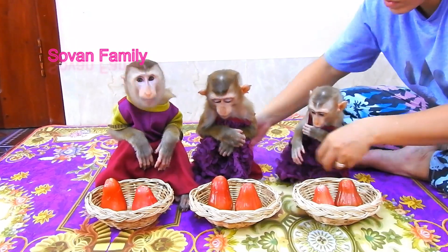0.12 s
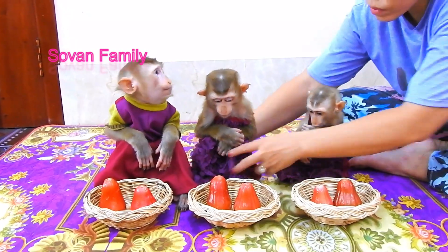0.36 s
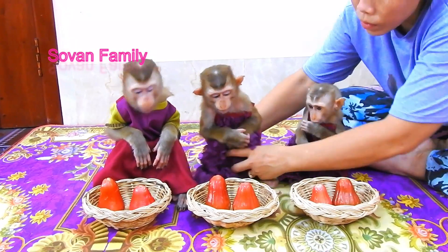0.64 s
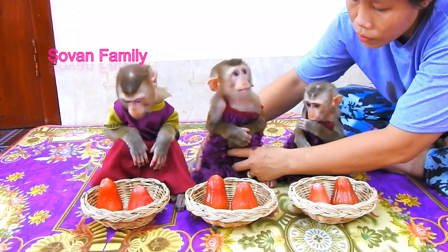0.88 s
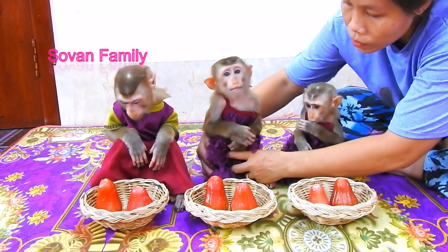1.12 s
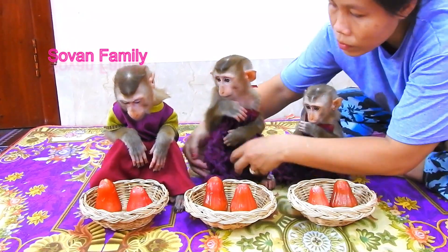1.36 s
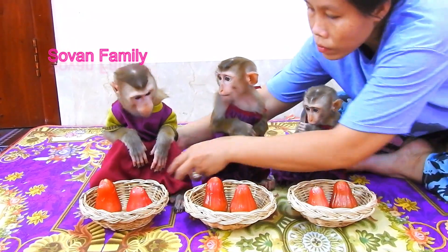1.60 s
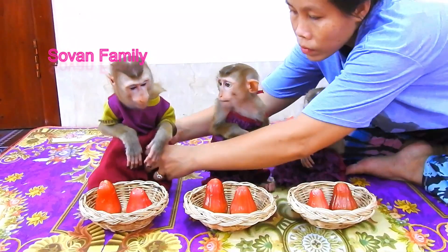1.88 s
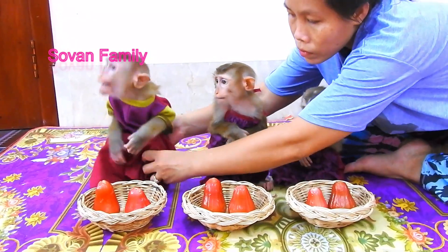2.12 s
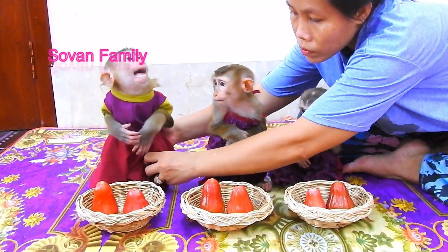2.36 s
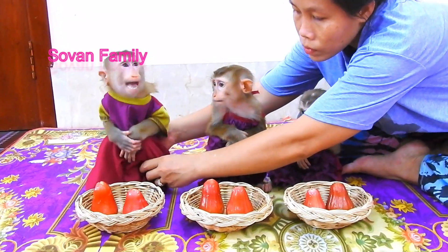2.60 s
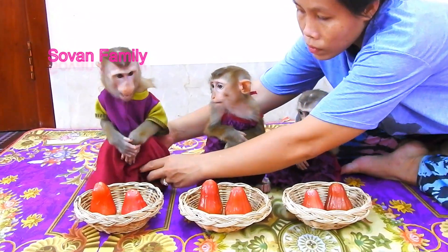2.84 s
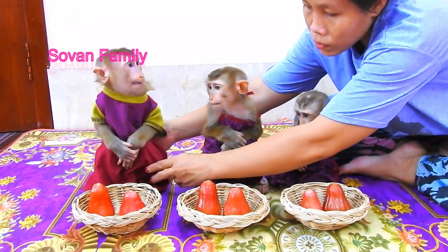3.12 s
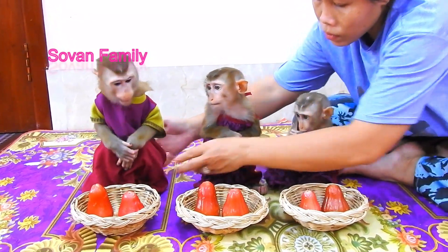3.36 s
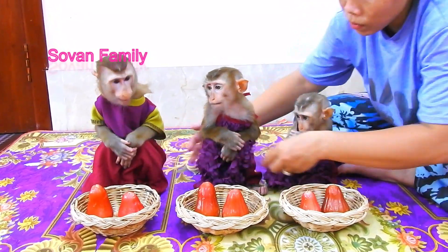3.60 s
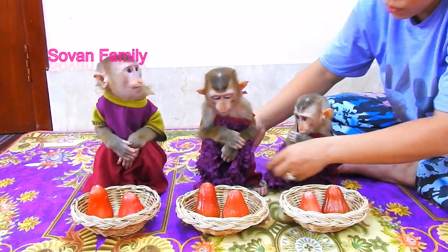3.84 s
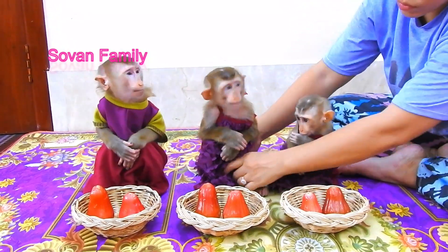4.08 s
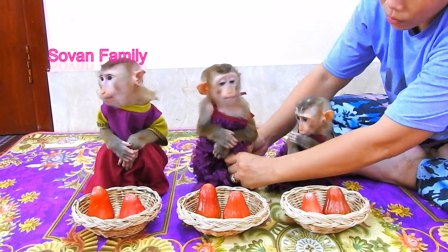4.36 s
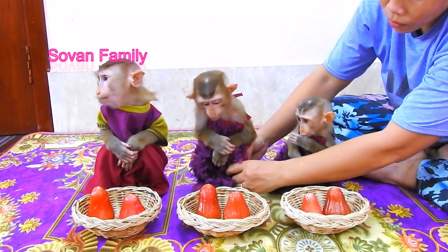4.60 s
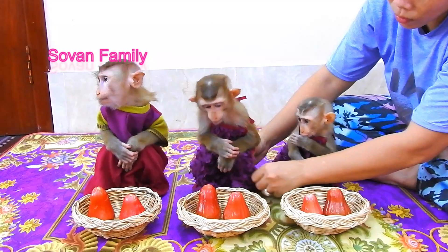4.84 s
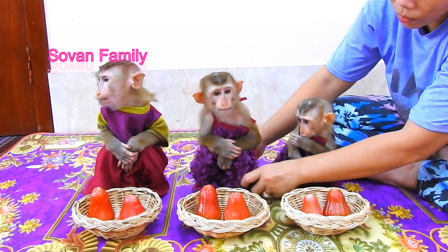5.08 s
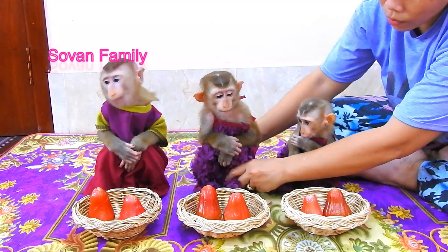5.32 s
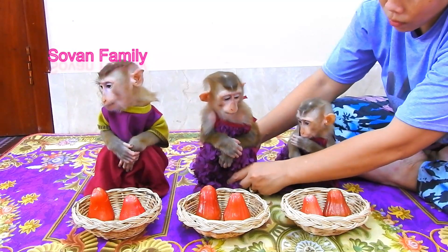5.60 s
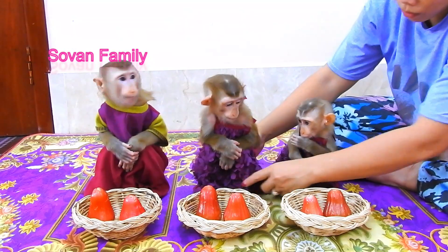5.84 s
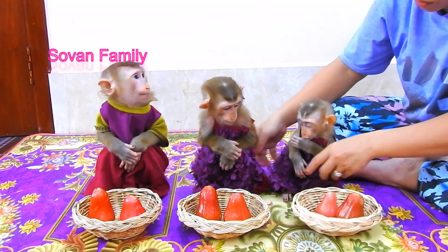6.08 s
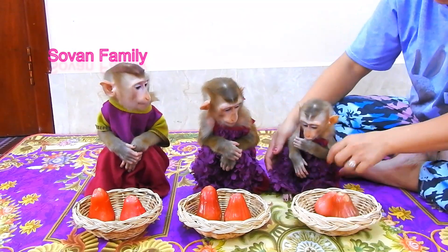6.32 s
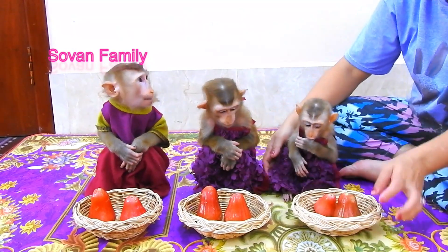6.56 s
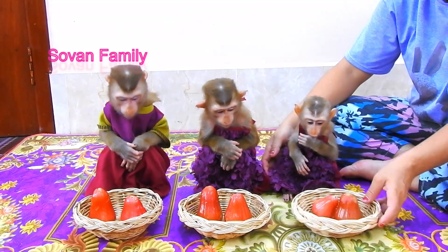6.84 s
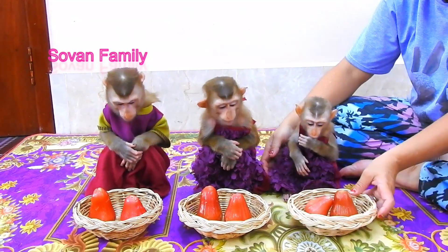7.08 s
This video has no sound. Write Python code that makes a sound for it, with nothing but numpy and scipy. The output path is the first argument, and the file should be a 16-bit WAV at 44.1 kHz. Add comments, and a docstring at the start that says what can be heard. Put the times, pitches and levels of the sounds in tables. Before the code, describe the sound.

Seven shrill young monkey chirps ring in a bare hard room, with low air buffeting, faint cloth and wicker rustling, then a soft coo.

```python
"""Three young monkeys in a bare, hard room, close to the microphone, as hands straighten their clothes.
Seven shrill chirps are swept partials around a whistled octave; a later coo is a stack of harmonics.
Cloth and wicker rustle as shaped crackle and ringing ticks, and echoes and a noisy tail make the room.
Moving air buffets the two ports as low noise and decaying puffs, over faint room noise.
A limiter holds the treble of the loud chirps flat and ducks the bass with it."""
import sys
import numpy as np
from scipy import signal
from scipy.fft import rfft, irfft, next_fast_len
from scipy.io import wavfile
from scipy.ndimage import uniform_filter1d

SR = 44100
rng = np.random.default_rng(int(sys.argv[2]) if len(sys.argv) > 2 else 0)


def waveform_to_disk(signal):
    """Save audio, clipped to [-1, 1], as 16-bit WAV at the path in sys.argv[1]."""
    frames = np.transpose(np.atleast_2d(signal))
    scaled = np.clip(frames, -1, 1) * 32767
    samples = np.round(scaled).astype(np.int16)
    wavfile.write(sys.argv[1], SR, samples)


def gain_from_db(level_db):
    """Convert decibel levels to linear amplitude factors (20 dB per decade)."""
    decades = np.asarray(level_db, float) / 20
    return 10 ** decades


N = 317386

# Room noise spectrum. Each row: frequency in Hz, relative density in dB per Hz.
AIR_COLOUR = [(15, -79), (25, -16.5), (107, 4.5), (160, -10.5), (215, -10), (246, -14.5), (340, -10.5),
              (421, -16), (614, -14), (782, -15.5), (919, -13.5), (2360, -23), (6730, -19.5),
              (10400, -40.5), (15500, -61)]
AIR_DB = -62  # rms
# Likeness of the room noise at the two ports. Each row: frequency in Hz, likeness from 0 to 1.
AIR_LIKENESS = [(60, 0.99), (180, 0.9), (550, 0.9), (1650, 0.9), (4970, 0.64), (15000, 0.18)]

# Moving air on the ports. Each row: time in seconds, rumble level in dB.
BUFFET_LEVEL = [(0.0, -46), (0.62, -49), (0.86, -54), (1.06, -43), (1.26, -58), (1.8, -60.5), (2.36, -54.5),
                (2.53, -37), (2.86, -58.5), (3.05, -70.5), (4.0, -76)]
# Rumble spectrum. Each row: frequency in Hz, relative density in dB per Hz.
BUFFET_COLOUR = [(12, -41), (20, -29), (59, 2.5), (107, 2), (186, -8), (251, -26.5), (364, -34), (544, -46),
                 (700, -59), (910, -85), (1540, -120)]
# The strongest puffs. Each row: start in seconds, level in dB, settled pitch in Hz, left minus right in dB.
THUMPS = [(0.049, -38, 102, 0), (0.181, -33.5, 103, 16), (0.308, -31, 68, 5), (0.348, -26, 113, 0),
          (0.479, -30, 97, -2), (0.521, -28.5, 173, -4), (0.587, -25.5, 74.6, -3),
          (0.658, -34, 100.5, 13.5), (0.919, -34, 64, 13), (0.972, -25.5, 104, -4), (1.148, -27, 92.5, 8.5),
          (1.558, -37.5, 64.6, -9), (1.638, -36.5, 88.5, -3), (1.856, -18, 119, 2.5), (1.89, -28, 132, 6),
          (1.952, -28, 70.4, -1), (1.985, -35, 78, 3), (2.533, -28, 111, -2), (2.575, -25.5, 97, 0),
          (2.617, -36, 98, -2), (2.677, -32, 110, -3), (2.917, -36.5, 87.5, -1)]
THUMP_T60_S = 0.083
THUMP_SAG, THUMP_SAG_S = 0.85, 0.0034  # the first swing is faster by this share, then settles
PUFFS_PER_S, PUFF_DB = 14, 10.5  # small puffs; dB above the rumble
PUFF_LOW_HZ, PUFF_HIGH_HZ = 67, 163

# Strokes of the hands over cloth and wicker. Each row: start in seconds, length in seconds,
# level of the 8.5-13 kHz band in dB at the hands.
STROKES = [(0.0, 0.16, -86), (0.566, 0.23, -79.5), (0.897, 0.18, -80.5), (1.04, 0.18, -76),
           (1.296, 0.27, -91), (1.764, 0.16, -76), (1.894, 0.42, -75), (4.245, 0.29, -85.5),
           (4.46, 0.81, -88.5), (5.202, 0.32, -92), (5.992, 0.068, -72.5), (6.06, .25, -83),
           (6.393, 0.15, -84)]
STROKE_RISE, STROKE_FADE_DB = 0.18, -5.5  # share of the length; loss by the end
# Fibre crackle spectrum. Each row: frequency in Hz, relative density in dB per Hz.
RUSTLE_COLOUR = [(180, -32), (300, -3), (391, -17), (907, -13), (1030, -19), (1300, -11), (2100, -11),
                 (6790, -7), (15500, -46)]
# Single ticks. Each row: start in seconds, ring level in dB at the hands, ring pitch in Hz,
# snap level in dB at the hands.
TICKS = [(.611, -53, 2500, -46), (1.859, -51, 770, -51), (4.47, -49.5, 1940, -44), (6.01, -56, 3100, -50),
         (6.068, -54, 1176, -50), (6.07, -37.5, 6600, -47), (6.08, -52, 4500, -48), (6.412, -48, 594, -63)]
# Snap spectrum. Each row: frequency in Hz, relative density in dB per Hz.
SNAP_COLOUR = [(300, 3), (1500, -3.5), (3000, 0), (6500, -1.5), (10000, -20.5), (15500, -43)]
TICK_RISE_S, TICK_FUZZ = 0.0003, 0.68  # fuzz: rms share by which the ring flickers

# First wall echoes. Each row: delay in seconds, left and right level in dB before the echo colour.
ECHOES = [(.006, -5, -42), (.011, -4, 3.5), (0.015, -8, -6.5), (.021, -11.5, -9), (0.029, -40, -19.5)]
# Walls and cloth swallow part of the top. Each row: frequency in Hz, gain in dB.
ECHO_COLOUR = [(3000, -2), (5000, -5.5), (7000, -8), (12000, 4.5)]
# Room tail. Each row: frequency in Hz, 60 dB decay time in seconds, left-right likeness from 0 to 1.
ROOM = [(500, 0.75, 1), (2500, 0.64, 0.79), (4900, 0.64, 0.63), (8000, 0.58, 0.12), (12800, 0.5, 0.081)]

# One table a chirp. Each row: time in seconds, pitch (half the octave) in Hz, effort in dB.
CHIRPS = [
    [(1.957, 3204, -53.5), (1.971, 3375, -39.5), (1.983, 3560, -42), (2.006, 3476, -40.5)],
    [(2.150, 3505, -32), (2.159, 3130, -25.5), (2.172, 3497, -27), (2.204, 3300, -24.5), (2.220, 2610, -31)],
    [(2.403, 3810, -30), (2.408, 3398, -24), (2.417, 3795, -26), (2.430, 3883, -29), (2.450, 3172, -24.5),
     (2.466, 2844, -20.5), (2.474, 2047, -38)],
    [(2.695, 3896, -22.5), (2.716, 4188, -30.5), (2.734, 3606, -22), (2.743, 3540, -28),
     (2.757, 2890, -31.5)],
    [(3.047, 3618, -28.5), (3.054, 3676, -34), (3.062, 4216, -29), (3.081, 3532, -22), (3.091, 2933, -23.5),
     (3.102, 1967, -44)],
    [(3.346, 2950, -26.5), (3.352, 2818, -26.5), (3.358, 3010, -26.5), (3.366, 3824, -26.5),
     (3.377, 3740, -39.5), (3.384, 4460, -23)],
    [(3.714, 4720, -60), (3.718, 4708, -45), (3.728, 4782, -40), (3.739, 4363, -39), (3.748, 3126, -47.5),
     (3.756, 2480, -47.5)],
]
# One row a chirp. Each row: settled fundamental in dB against the octave before the throat, its
# unsteadiness from 0 to 1, extra spacing of the partials as a share of the pitch at the start,
# the same at the end, attack in seconds.
VOICES = [(-29, 0.6, .28, 0.059, .001), (-32, 0.6, .08, .02, .0006), (-25, 0.4, 0.0075, 0.018, 0.0011),
          (-25, 0.5, 0.031, 0.024, 0.00025), (-29, 0.12, 0, 0.059, 0.00035),
          (-28, 0.6, 0.0049, 0.0017, 0.00075), (1.5, 0.04, 0, 0, .001)]
# Third and fourth partial in dB against the octave, before the throat.
OVERTONES_DB = [-13.5, -12.5]
# Throat on the octave and above. Each row: frequency in Hz, gain in dB.
CHIRP_THROAT = [(4000, 12.5), (5300, -13), (6000, 2.5), (7500, 4), (9000, -7.5), (12000, -13), (16000, -37)]
# Throat on the fundamental. Each row: frequency in Hz, gain in dB.
LOW_THROAT = [(2000, 3), (2900, 2), (3500, 1.5), (4100, 3.5), (4750, 3)]
LOW_ONSET_DB, LOW_ONSET_S = 10.5, 0.0054  # early boost of the fundamental and its decay
SPACING_SETTLES_S, RELEASE_S = 0.0207, 0.0022
CHIRP_ROUGH = 0.084  # rms share by which the level flickers
PITCH_ROUGH = 0.14 * CHIRP_ROUGH  # rms share by which the pitch shakes

# The coo. Each row: time in seconds, pitch in Hz, level in dB.
COO = [(6.522, 963, -65), (6.57, 958, -61), (6.589, 965.8, -53), (6.654, 974.4, -50.5), (6.70, 951, -48.5),
       (6.756, 790, -54), (6.785, 733, -53), (6.83, 719.2, -52), (6.87, 742.4, -51), (6.898, 767, -52),
       (6.914, 743, -64), (6.936, 680, -61.5), (6.957, 666, -43.5)]
# Throat and mouth of the coo. Each row: frequency in Hz, relative gain in dB.
COO_THROAT = [(600, -8), (970, 6.5), (1440, -3), (1900, -16.5), (2200, -9.5), (3000, -17), (3700, -8.5),
              (4500, -12.5), (5200, -20.5), (5900, -19), (7400, -9.5), (9000, -26.5), (13000, -54)]
COO_ONSET_BRIGHT_DB, COO_ONSET_S = 4, 0.058  # dB per octave; the soft onset is thin and bright
COO_OPENS_DB_PER_S = 5  # dB per octave each second: brightness grows as the mouth opens

TREBLE_FROM_HZ, TREBLE_LATE_S = 4350, 0.00941


def evened(x):
    """Scales to rms 1."""
    return x / np.sqrt(np.mean(x ** 2) + 1e-20)


def read(points, hz):
    """Reads a table along log frequency."""
    f, value = np.transpose(points)
    return np.interp(np.log(hz + 1), np.log(f + 1), value)


def add(mix, s, sound):
    """Mixes a sound in at s seconds."""
    part = mix[..., round(s * SR):][..., :sound.shape[-1]]
    part += sound[..., :part.shape[-1]]


def coloured(x, points):
    """Filters along time with a spectrum in dB."""
    size = next_fast_len(N)
    gain = gain_from_db(read(points, np.fft.rfftfreq(size, 1 / SR)))
    return irfft(rfft(x, size) * gain, size)[..., :N]


def wobble(count, size):
    """Smooth random curve of rms 1, averaged over size samples."""
    return uniform_filter1d(rng.standard_normal(count), size) * np.sqrt(size)


def sides(pan_db):
    """Left and right gains."""
    return gain_from_db(np.array([pan_db / 2, -pan_db / 2]))


def air():
    """Steady room noise with drifting patches, alike at both ports in the bass."""
    frames, hz = N // 256 + 5, np.fft.rfftfreq(1024, 1 / SR)
    a, b, c, d, patches = rng.standard_normal((frames, 513, 5)).T
    patches = uniform_filter1d(patches, 10, 0)  # smooth along frequency
    patches = evened(uniform_filter1d(patches, 14, 1))  # and along time
    same = np.clip(read(AIR_LIKENESS, hz), -1, 1)[:, None]
    left = a + 1j * b
    right = same * left + np.sqrt(1 - same ** 2) * (c + 1j * d)
    z = np.array([left, right]) * gain_from_db(1.9 * patches)
    noise = signal.istft(z, nperseg=1024, noverlap=768)[1][:, :N]
    return gain_from_db(AIR_DB) * evened(coloured(noise, AIR_COLOUR))


def thump(db, hz, pan_db, lead):
    """One puff swings both diaphragms out of step and knocks the housing."""
    u = np.arange(6000) / SR
    turn = 2 * np.pi * hz * (u + THUMP_SAG * THUMP_SAG_S * (1 - np.exp(-u / THUMP_SAG_S)))
    swing = np.sin(turn + np.array([[0], [lead]]))
    swing *= gain_from_db(-60 * u / THUMP_T60_S) * (1 - np.exp(-u / 0.0052))
    knock = np.sin(1.824 * turn + np.array([[lead], [0]]))
    knock *= gain_from_db(-12.5 - 60 * u / 0.067) * (1 - np.exp(-u / 0.0092))
    return gain_from_db(db) * sides(pan_db)[:, None] * (swing + knock)


def buffet():
    """Lumpy low rumble, unrelated at each port, with strong single puffs and many small ones."""
    t = np.arange(N) / SR
    level_db = np.interp(t, *np.transpose(BUFFET_LEVEL), right=-140)
    lumps = gain_from_db(3.7 * np.array([wobble(N, size=900), wobble(N, size=900)]))
    rumble = coloured(rng.standard_normal((2, N)) * lumps, BUFFET_COLOUR)
    out = evened(rumble) * gain_from_db(level_db)
    slots = np.arange(0, BUFFET_LEVEL[-1][0], 1 / PUFFS_PER_S)
    late, pitch = rng.random((len(slots), 2)).T
    s = slots + late / PUFFS_PER_S
    puff_db = np.interp(s, t, level_db) + PUFF_DB
    puff_hz = PUFF_LOW_HZ * (PUFF_HIGH_HZ / PUFF_LOW_HZ) ** pitch
    small = zip(s, puff_db, puff_hz, np.zeros(len(s)))  # centred
    for s, *row in [*THUMPS, *small]:
        lead = rng.uniform(0.33, 2.8) * rng.choice([-1, 1])  # radians between the ports
        add(out, s, thump(*row, lead))
    return out


def stroke(length, db):
    """Pressure rises, then fades until the hand lets go."""
    u = np.arange(0, 1, 1 / (length * SR))
    fade_db = STROKE_FADE_DB * np.maximum(u - STROKE_RISE, 0) / (1 - STROKE_RISE)
    return gain_from_db(db + fade_db) * np.minimum(u / STROKE_RISE, 1) * np.minimum((1 - u) / 0.19, 1)


def rustle():
    """Dense crackle of fibres, sparse grains of uneven size, under the pressure of each stroke."""
    sizes = gain_from_db(3.5 * np.minimum(rng.exponential(1, N), 4))
    struck = rng.random(N) < 5000 / SR  # 5000 grains a second
    crackle = coloured(rng.standard_normal(N) * sizes * struck, RUSTLE_COLOUR)
    band = signal.butter(4, [8500, 13000], "bandpass", fs=SR, output="sos")
    top = signal.sosfilt(band, crackle)
    pressure = np.zeros(N)
    for s, length, db in STROKES:
        add(pressure, s, stroke(length, db))
    return pressure * crackle / top.std()


def ticks():
    """Single ticks of wicker and claws: a fuzzy ring and a short snap of noise."""
    out, u = np.zeros(N), np.arange(2000) / SR
    snaps = evened(coloured(rng.standard_normal(N), SNAP_COLOUR))
    snaps = snaps[:2000 * len(TICKS)].reshape(-1, 2000)
    for (s, db, hz, snap_db), snap in zip(TICKS, snaps):
        ring = np.sin(2 * np.pi * hz * u) * gain_from_db(-60 * u * hz / 45)  # as many swings at any pitch
        ring *= 1 + TICK_FUZZ * wobble(len(u), size=round(SR / hz))
        tick = gain_from_db(db) * ring + gain_from_db(snap_db - 60 * u / 0.017) * snap
        add(out, s, tick * np.minimum(u / TICK_RISE_S, 1))
    return out


def room(x):
    """A few wall echoes, then sparse taps of random sign, each band dying at its own speed."""
    taps = np.zeros((2, SR))
    at = np.arange(450, SR - 20, 20) + rng.integers(0, 20, (2, (SR - 451) // 20))
    np.put_along_axis(taps, at, rng.choice([-1., 1.], at.shape), 1)
    hz, t, z = signal.stft(taps, SR, nperseg=256)
    t60, same = (read([(row[0], row[k]) for row in ROOM], hz)[:, None] for k in (1, 2))
    same = np.clip(same, 0, 1)  # close ports share the long waves
    z = np.array([z[0], same * z[0] + np.sqrt(1 - same ** 2) * z[1]])
    tail = signal.istft(z * gain_from_db(-60 * t / t60), SR, nperseg=256)[1]
    tail *= gain_from_db(1.5) / np.linalg.norm(tail[0])
    echoes = np.zeros((2, 4096))
    for s, *db in ECHOES:
        echoes[[0, 1], round(s * SR) + np.array([1, 0])] += gain_from_db(db)  # one sample later at the left port
    add(tail, 0, coloured(echoes, ECHO_COLOUR)[:, :4096])
    tail[[0, 1], [0, 1]] += 1  # direct sound from the left: one sample later at the right port
    return signal.fftconvolve(x[None], tail, axes=1)[:, :N]


def chirp(rows, low_db, low_rough, spread, last_spread, attack):
    """Tight folds whistle at the octave; a second vibration sets the spacing of the partials around it."""
    s, *columns = np.transpose(rows)
    t = np.arange(s[0], s[-1], 1 / SR)
    since = t - s[0]
    hz, effort_db = (np.interp(t, s, c) for c in columns)
    low_db = low_db - 14 * np.exp(-since / 0.0012)  # the fundamental swells in softly
    low_db += LOW_ONSET_DB * np.exp(-since / LOW_ONSET_S)
    low_db += 20 * np.log10(abs(1 + low_rough * wobble(len(t), size=90)) + 1e-6)
    spacing = 1 + last_spread + (spread - last_spread) * np.exp(-since / SPACING_SETTLES_S)
    shaken = hz * (1 + PITCH_ROUGH * wobble(len(t), size=40))
    tone = np.zeros(len(t))
    for k, db in enumerate([low_db, 0, *OVERTONES_DB]):
        multiple = 2 + (k - 1) * spacing
        throat_db = read(CHIRP_THROAT if k else LOW_THROAT, multiple * hz)
        tone += gain_from_db(db + throat_db) * np.sin(2 * np.pi * np.cumsum(multiple * shaken) / SR)
    edge = np.clip(np.minimum(since / attack, (s[-1] - t) / RELEASE_S), 0, 1)
    flicker = 1 + CHIRP_ROUGH * wobble(len(t), size=30)
    return s[0], np.sqrt(2) * gain_from_db(effort_db) * flicker * tone * edge


def coo():
    """A clear stack of harmonics through a nearly shut mouth."""
    s, *columns = np.transpose(COO)
    t = np.arange(s[0], s[-1], 1 / SR)
    since = t - s[0]
    hz, level_db = (np.interp(t, s, c) for c in columns)
    bright_db = COO_ONSET_BRIGHT_DB * np.exp(-(since / COO_ONSET_S) ** 6) + COO_OPENS_DB_PER_S * since
    turn = 2 * np.pi * np.cumsum(hz * (1 + 0.002 * wobble(len(t), size=200))) / SR
    harmonics = np.arange(1, 19)
    sizes = np.array([gain_from_db(read(COO_THROAT, k * hz) + bright_db * np.log2(k)) for k in harmonics])
    tone = (sizes * np.sin(harmonics[:, None] * turn)).sum(0)
    tone /= np.sqrt((sizes ** 2).sum(0) / 2)  # rms 1 at every moment
    return s[0], gain_from_db(level_db) * tone * signal.windows.tukey(len(t), 0.08)


def scene():
    """Calls and hands in the room, over room noise and buffeting."""
    calls = np.zeros(N)
    for rows, voice in zip(CHIRPS, VOICES):
        add(calls, *chirp(rows, *voice))
    add(calls, *coo())
    hands = rustle() + ticks()
    in_room = room(calls + gain_from_db(-9.5) * hands)
    close = gain_from_db(-13.0) * hands  # near the microphone, so less of the room
    return in_room + close + air() + buffet()


def roll_off(x):
    """The treble ends steeply here."""
    return signal.sosfilt(signal.butter(12, 16210, fs=SR, output="sos"), x)


def record(dry):
    """The treble passes a limiter and comes late; the bass is ducked by nearly as much."""
    dry = signal.sosfilt(signal.butter(2, 45, "highpass", fs=SR, output="sos"), dry)  # rumble filter
    low = signal.oaconvolve(dry, signal.firwin(401, TREBLE_FROM_HZ, fs=SR)[None], "same")
    high = dry - low
    power_db = 10 * np.log10(abs(uniform_filter1d((high ** 2).mean(0), 130)) + 1e-12)
    fall = np.arange(N) * 105.0 / SR  # recovery of 105 dB a second
    held_db = np.maximum.accumulate(power_db + fall) - fall
    over_db = np.maximum(held_db + 32, 0)  # threshold -32 dB
    keep = np.exp(-1 / (0.0017 * SR))  # slow enough to let the first peak through
    over_db = signal.lfilter([1 - keep], [1, -keep], over_db)
    late = np.roll(high / gain_from_db(1.017 * over_db), round(TREBLE_LATE_S * SR), axis=1)
    return roll_off(low / gain_from_db(0.99 * over_db) + late)


dry = scene()
out = record(dry)
waveform_to_disk(out)
```